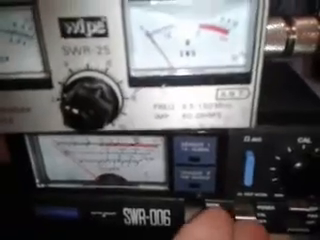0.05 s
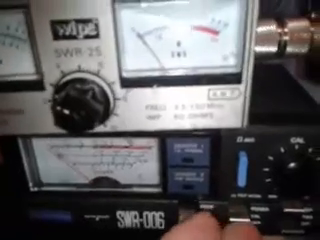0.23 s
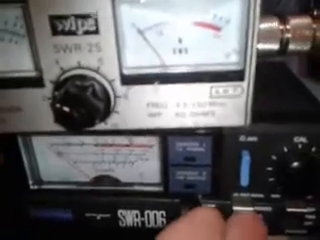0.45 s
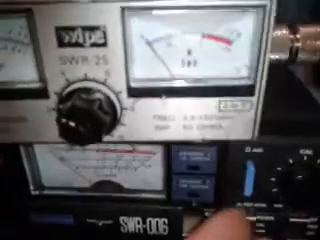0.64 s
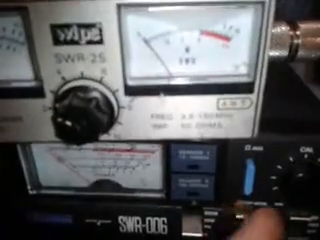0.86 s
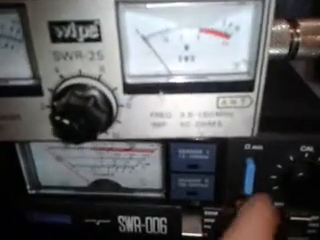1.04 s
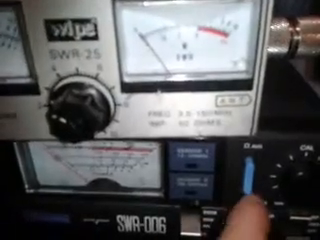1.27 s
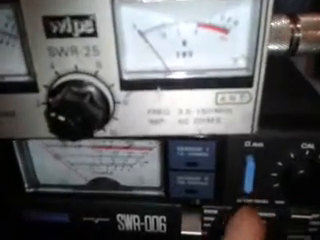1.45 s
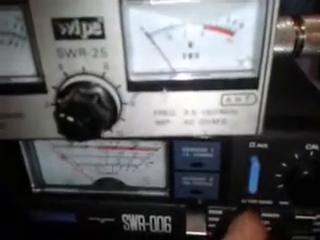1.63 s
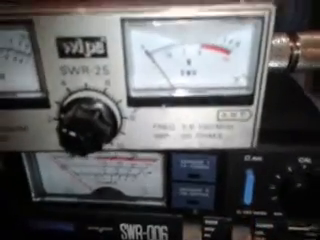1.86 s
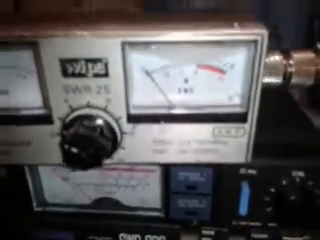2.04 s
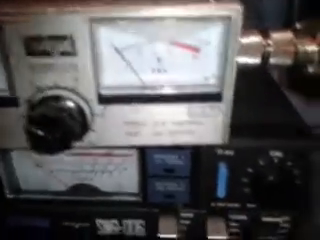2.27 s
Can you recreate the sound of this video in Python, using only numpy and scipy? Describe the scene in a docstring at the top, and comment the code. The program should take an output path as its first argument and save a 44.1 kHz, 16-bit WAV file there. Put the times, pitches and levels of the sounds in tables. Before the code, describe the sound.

Small toggle switches on a metal-cased meter click sharply three times, each with a brief metallic ring. Lighter fingertip ticks fall between them, and one press thumps the workbench dully. Close microphone in a small, dry room.

```python
"""Toggle switches on a meter

Small switches are flicked on a metal-cased meter, close to the microphone. Each throw is a spring snap,
a short ring of the front panel and a knock in the case; a fingertip makes lighter ticks between.
Pushes reach the workbench, which thuds and wobbles. A small dry room, steady noise, a faint hum."""
import sys
import numpy as np
from scipy import signal
from scipy.fft import rfft, irfft
from scipy.io import wavfile

SR = 44100
rng = np.random.default_rng(int(sys.argv[2]) if len(sys.argv) > 2 else 0)


def store_wav(level_fs):
    """Save 16-bit WAV to argv[1]."""
    pcm = np.round(np.clip(np.atleast_2d(level_fs), -1, 1) * 32767)
    wavfile.write(sys.argv[1], SR, pcm.T.astype(np.int16))


N = 101474
T = np.arange(N) / SR


def from_db(db):
    """Decibels to gain."""
    return 10 ** (np.asarray(db) / 20)


def unit_rms(x):
    """Scale to rms 1."""
    return x / np.sqrt(np.mean(x ** 2) + 1e-20)


def since(start):
    """Seconds since start, zero before it."""
    return np.maximum(T - start, 0)


def noise(spectrum):
    """Noise of rms 1, shaped by (Hz, dB) points."""
    hz, db = np.transpose(spectrum)
    bin_hz = np.arange(N // 2 + 1) * SR / N
    gain = from_db(np.interp(np.log(bin_hz + 1), np.log(hz), db))
    return unit_rms(irfft(rfft(rng.standard_normal(N)) * gain, N))


def burst(start, rise_s, fall_s):
    """Envelope of height 1 that swells and dies away."""
    t = since(start)
    shape = (1 - np.exp(-(t / rise_s) ** 2)) * np.exp(-t / fall_s)
    return shape / (shape.max() + 1e-20)


def struck(modes, start, spread_db):
    """Decaying modes, each hit with a randomly varied strength."""
    t = since(start)
    return sum(from_db(db + spread_db * rng.standard_normal() - 60 * t / t60) * np.sin(2 * np.pi * hz * t)
               for hz, db, t60 in modes)


# Each row: frequency in Hz, relative noise density in dB.
AIR_SPECTRUM = [(20, -16.5), (45, -15.5), (70, -29), (110, -39), (160, -28), (230, -10), (310, -9),
                (350, -8.5), (470, -2.5), (560, -0.5), (700, -7), (1130, -9), (1790, -9.5), (2050, -13),
                (2390, -23.5), (3200, -18.5), (4000, -25.5), (6760, -25), (8000, -44)]
# Each row: frequency in Hz, rms level in dB.
HUM_TONES = [(468, -61.5), (1201, -66)]

def background():
    """Steady room noise with a faint hum."""
    hum = sum(from_db(db) * np.sqrt(2) * np.sin(2 * np.pi * (hz * T + rng.random()))
              for hz, db in HUM_TONES)
    return from_db(-51.5) * noise(AIR_SPECTRUM) + hum


# Bench reflection. Each row: delay in seconds, level in dB.
REFLECTIONS = [(.0046, -13)]

def room(x, wet_db, wet_t60_s=0.11, late_db=-28.5, late_t60_s=0.28):
    """Direct sound, a reflection, a quick diffuse tail and a faint longer one."""
    response = np.zeros(N)
    response[0] = 1
    for delay, db in REFLECTIONS:
        response += from_db(db) * np.sinc((T - delay) * SR)
    for db, t60 in (wet_db, wet_t60_s), (late_db, late_t60_s):
        tail = rng.standard_normal(N) * burst(0, rise_s=0.005, fall_s=t60 / np.log(1000))
        response += from_db(db) * unit_rms(tail) / np.sqrt(N)
    return signal.fftconvolve(x, response)[:N]


# Bench top. Each row: frequency in Hz, level in dB, t60 in seconds.
BENCH_MODES = [(165.7, -9.5, 0.069), (251.6, -13.5, 0.32), (307.5, -4, 0.14), (380, -10, .1),
               (512.4, -9.5, 0.33), (584, -4.5, 0.13), (672, -10, 0.12), (1023, -11.5, .15)]
# Each row: start in seconds, thud level in dB, wobble level in dB.
PUSHES = [(0.505, -43.5, -59.5), (1.283, -43, -67.5), (1.4775, -31, -40.5), (2.228, -45, -51)]

def bench(wobble_hz=43.25, wobble_t60_s=0.67, phase_lag_s=0.025):
    """A push thuds in the bench top; the meter rocks on it and shakes the microphone."""
    thuds, wobble = np.zeros((2, N))
    for start, thud_db, wobble_db in PUSHES:
        thuds += from_db(thud_db) * struck(BENCH_MODES, start, spread_db=0.6)
        envelope = burst(start, rise_s=0.023, fall_s=wobble_t60_s / np.log(1000))
        rocking = np.sin(2 * np.pi * wobble_hz * (T - start - phase_lag_s))
        wobble += from_db(wobble_db) * envelope * rocking
    return thuds, wobble


# Each row: frequency in Hz, level in dB, t60 in seconds.
CASE_MODES = [(1690, 0, .125), (790, -24, .12), (1172, -12, .08), (1289, -11, .09), (1442, -6, .09),
              (1620, -8, .08), (1760, -6, .09), (1837, -10, .11), (2126, -20, .1), (2444, -26, .1)]

def case_ring(start, tilt_db_per_octave=0, pivot_hz=1690, rise_s=0.0054):
    """The ring spreads from the panel into the metal case; tilt favours low or high modes."""
    modes = [(hz, db + tilt_db_per_octave * np.log2(hz / pivot_hz), t60) for hz, db, t60 in CASE_MODES]
    return struck(modes, start, spread_db=3.8) * (1 - np.exp(-since(start) / rise_s))


# Each row: frequency in Hz, level in dB.
SPRING_MODES = [(2125, -22.5), (2445, -28), (3360, -33.5), (3620, -22.5), (5513, -21), (6013, -23),
                (6140, -43), (6283, -40), (6403, -28.5), (6658, -30)]

def spring_ring(start, t60_s=0.105):
    """The spring's bright modes, all dying at the same rate."""
    return struck([(hz, db, t60_s) for hz, db in SPRING_MODES], start, spread_db=1.5)


# Each row: frequency in Hz, relative noise density in dB.
SNAP_SPECTRUM = [(300, -24), (1000, -1.5), (2000, 5.5), (2800, 4), (3700, -0.5), (4600, -1.5), (5500, -3),
                 (6300, 3), (7000, 2.5), (7700, -14)]

def snap(start, treble_db, pivot_hz=4500):
    """The spring's contacts clash: a very short bright crack."""
    tilted = [(hz, db + treble_db * np.tanh(2 * np.log2(hz / pivot_hz))) for hz, db in SNAP_SPECTRUM]
    return noise(tilted) * burst(start, rise_s=0.0006, fall_s=0.00092)


def scrape(start=1.476):
    """The fingertip drags during the hard press."""
    return from_db(-47.5) * noise(SNAP_SPECTRUM) * burst(start, rise_s=0.0031, fall_s=0.013)


def metal_ping(start, hz, swell_s, sharpness=5.3):
    """Stiff metal rings for a few cycles, peaking after swell_s."""
    t = since(start)
    envelope = (t / swell_s * np.exp(1 - t / swell_s)) ** sharpness
    return envelope * np.sin(2 * np.pi * hz * t)


# A fingertip nudges a lever in its play. Each row: start in seconds, panel level in dB,
# panel pitch in Hz, snap level in dB, snap treble in dB.
LEVER_TICKS = [(0.036, -31, 1720, -54, -2), (0.464, -41.5, 1550, -60, -11), (0.514, -44, 2050, -38, -9.5),
               (1.147, -52, 2030, -46, -9), (1.427, -43.5, 2040, -40, -9.5), (1.47, -33.5, 1706, -65, -5),
               (1.4759, -26, 1535, -36, -9.5), (1.483, -30, 1870, -37.5, -9),
               (1.563, -43, 1580, -57.5, -16), (1.6077, -51, 1714, -50, -15), (1.651, -40, 1700, -46.5, -4),
               (1.7510, -30, 1700, -40, -2.5), (1.8106, -31.5, 2070, -30, -10.5),
               (2.2094, -35.5, 1755, -66, -7)]
# A lever goes over. Each row: start in seconds, panel level in dB, panel pitch in Hz,
# panel swell in seconds, snap level in dB, snap treble in dB, case level in dB,
# case tilt in dB per octave, knock level in dB, spring ping level in dB.
LEVER_THROWS = [(0.7378, -6.5, 1596, 0.0025, -31, -11.5, -25, -15, -35, -59.5),
                (1.2798, -4, 1684, 0.0035, -8, 1, -17.5, 6, -41.5, -12),
                (2.2236, -8, 1701, 0.0025, -17.5, -7, -19.5, -10.5, -31.5, -41)]

def panel(knock_band_hz=(475, 900)):
    """Each throw or tick rings the front panel; a throw adds a hollow knock."""
    knock_filter = signal.butter(2, knock_band_hz, "band", fs=SR, output="sos")
    hollow = unit_rms(signal.sosfilt(knock_filter, rng.standard_normal(N)))
    sound = np.zeros(N)
    for start, panel_db, hz, swell_s, *_, knock_db, _ in LEVER_THROWS:
        sound += from_db(panel_db) * metal_ping(start, hz, swell_s)
        sound += from_db(knock_db) * hollow * burst(start, rise_s=0.0035, fall_s=0.012)
    for start, panel_db, hz, *_ in LEVER_TICKS:
        sound += from_db(panel_db) * metal_ping(start, hz, swell_s=0.0032)
    return sound


def springs():
    """The spring cracks and pings on a throw, and only snaps faintly on a tick."""
    sound = np.zeros(N)
    for start, _, _, _, snap_db, treble_db, *_, ping_db in LEVER_THROWS:
        sound += from_db(snap_db) * snap(start, treble_db)
        sound += from_db(ping_db) * metal_ping(start, hz=6397, swell_s=0.00066)
    for start, _, _, snap_db, treble_db in LEVER_TICKS:
        sound += from_db(snap_db) * snap(start, treble_db)
    return sound


def after_ring(tick_case_db=-13.5):
    """Case and spring ring on after a throw, the case alone after a tick."""
    sound = np.zeros(N)
    for start, _, _, _, snap_db, _, case_db, case_tilt, *_ in LEVER_THROWS:
        sound += from_db(case_db) * case_ring(start, case_tilt)
        sound += from_db(snap_db) * spring_ring(start)
    for start, panel_db, *_ in LEVER_TICKS:
        sound += from_db(panel_db + tick_case_db) * case_ring(start)
    return sound


def scene(mic_low_hz=249):
    """Switches and thuds, thinned in the bass by the microphone, over wobble and background."""
    switches = room(panel(), wet_db=-10)
    switches += room(springs() + scrape(), wet_db=-4.5)  # hidden springs: heard more via the room
    switches += after_ring()
    thuds, wobble = bench()
    low_cut = signal.butter(5, mic_low_hz, "high", fs=SR, output="sos")
    return (signal.sosfilt(low_cut, switches + thuds) + wobble + background())[None]


def record(dry, ceiling=0.74, mic_top_hz=7000, cutoff_hz=8312, dc_offset=0.0046):
    """A narrow-band recorder flattens the highest peaks, cuts the top and sits slightly off zero."""
    x = dry / (1 + (dry / ceiling) ** 8) ** (1 / 8)
    x = signal.sosfilt(signal.butter(12, mic_top_hz, fs=SR, output="sos"), x)
    return signal.sosfilt(signal.ellip(8, .2, 70, cutoff_hz, fs=SR, output="sos"), x) + dc_offset


dry = scene()
out = record(dry)
store_wav(out)
```